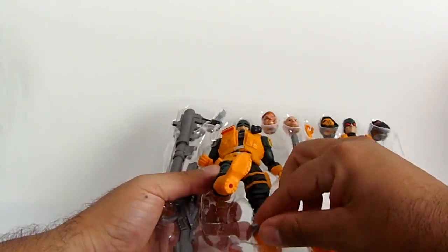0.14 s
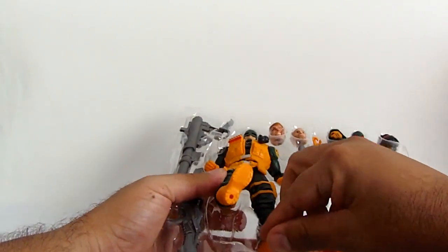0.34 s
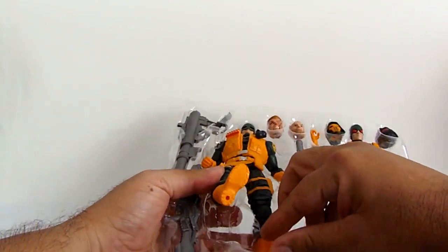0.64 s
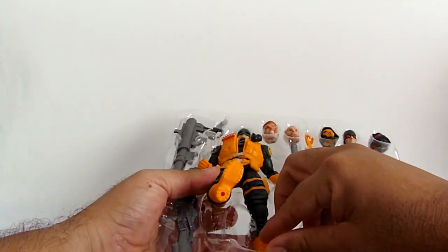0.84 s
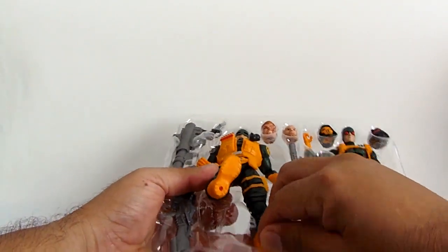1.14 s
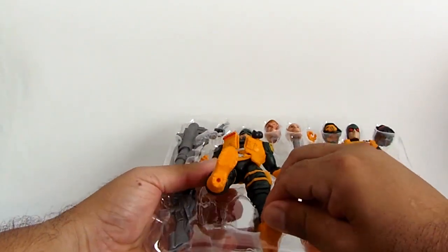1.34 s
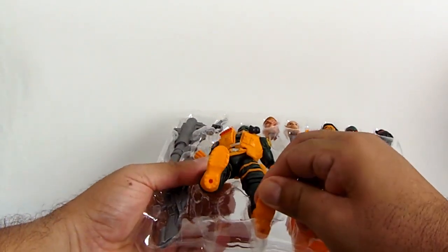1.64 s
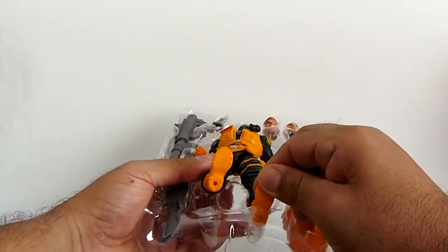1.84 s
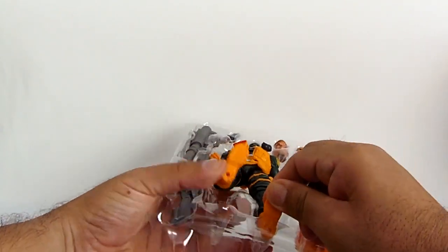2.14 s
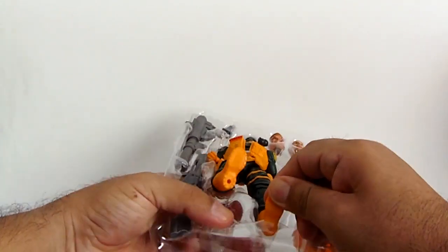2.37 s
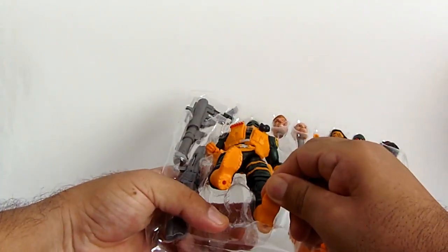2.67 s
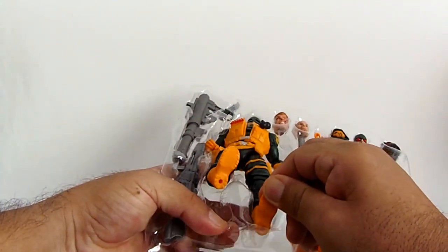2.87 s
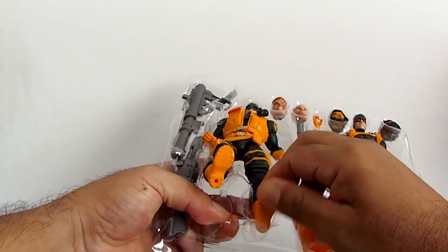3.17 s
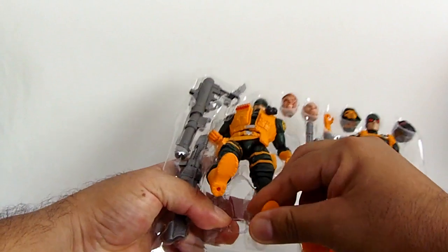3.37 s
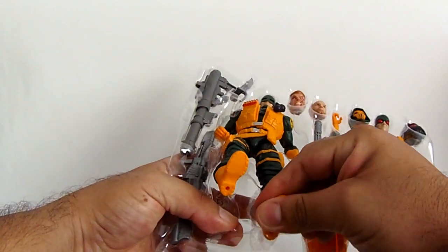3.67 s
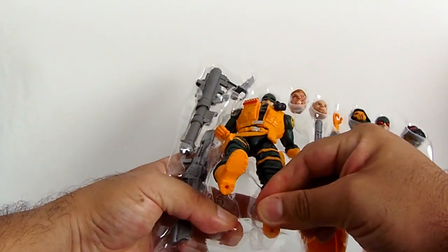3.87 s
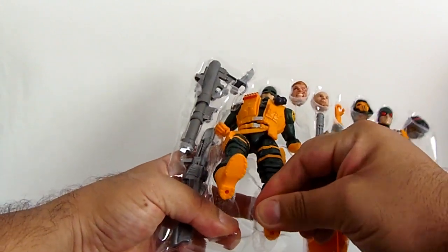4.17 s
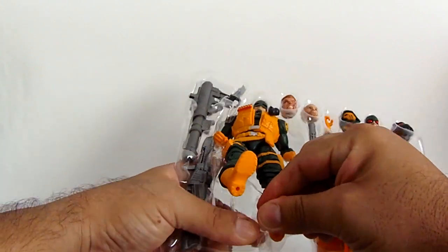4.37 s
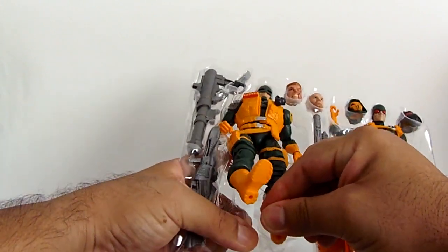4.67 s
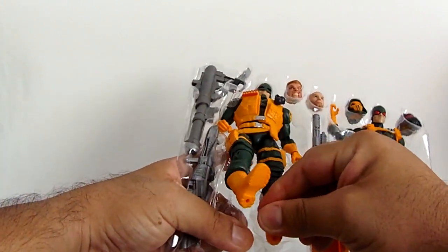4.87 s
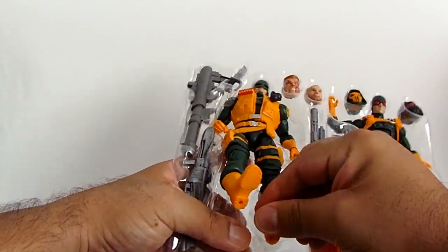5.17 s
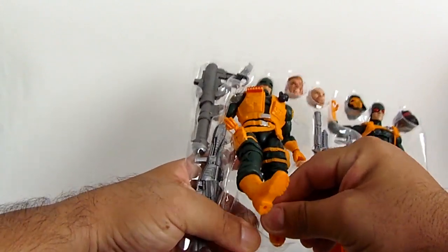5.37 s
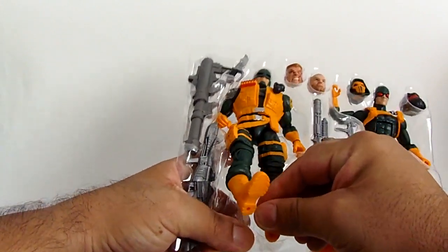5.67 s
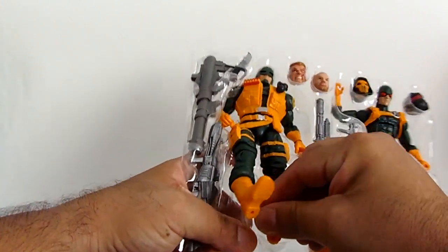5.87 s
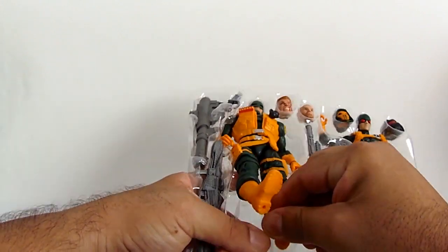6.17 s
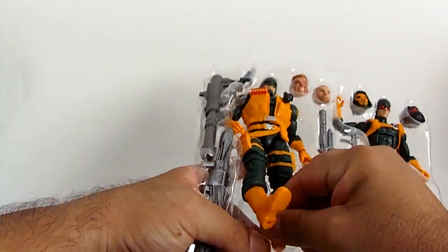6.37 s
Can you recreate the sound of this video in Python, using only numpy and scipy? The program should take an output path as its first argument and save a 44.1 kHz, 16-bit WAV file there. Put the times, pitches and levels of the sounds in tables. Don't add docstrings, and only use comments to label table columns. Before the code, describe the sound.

A thin blister sheet buckles under squeezing fingers: fine fizzing creases, dull pops and bright snaps, irregular and never rhythmic. The hollow tray answers with short low-mid knocks and a faint hum. Loudest cracks arrive in the middle and second half, between thinner ticking gaps. Close microphone, small room, brief reflections, faint air hiss and table rumble.

```python
import sys
import numpy as np
from scipy import signal
from scipy.io import wavfile
from scipy.ndimage import uniform_filter1d

SR = 44100
rng = np.random.default_rng(int(sys.argv[2]) if len(sys.argv) > 2 else 0)


def wav_out(sig):
    wavfile.write(sys.argv[1], SR, np.round(np.clip(np.atleast_2d(sig).T, -1, 1) * 32767).astype(np.int16))


def linear_from_db(decibels):
    return 10 ** (np.asarray(decibels, float) / 20)


N = 287658

# start_s, low_db, pitch_hz, crisp_db, fizz_db
CRACKS = [(.4162, -23.5, 1075, -27.5, -28), (.6062, -26, 3300, -27.5, -39), (.7057, -21, 3130, -15, -17),
          (.7193, -22.5, 1510, -32, -43), (1.1672, -22, 1165, -22.5, -26), (1.199, -24.5, 3570, -19.5, -21),
          (1.7677, -24.5, 1630, -26, -26), (2.012, -24, 2830, -22, -26), (2.0171, -21.5, 2530, -23.5, -23),
          (2.048, -19.5, 4700, -25, -23), (2.0702, -19.5, 1270, -14.5, -22), (2.8276, -17, 3760, -13, -15),
          (2.8352, -16.5, 1014, -32, -19), (3.4183, -20.5, 2770, -18, -30), (4.104, -19, 5870, -13.5, -11),
          (4.12, -16, 1870, -37, -36), (4.4349, -12, 1630, -9.5, -15.5), (4.6371, -26.5, 1790, -23.5, -34),
          (5.0991, -22, 5080, -19, -23.5), (5.3226, -27, 2010, -19, -24), (5.35, -15, 1620, -28, -26),
          (5.993, -30.5, 6050, -16, -36), (6.0942, -21, 1490, -23, -31), (6.254, -15, 3240, -15, -15)]
# start_s, level_db, pitch_hz
POPS = [(0.1908, -28, 1300), (0.282, -34, 1870), (0.3642, -29.5, 1700), (.4397, -26, 1510),
        (1.4836, -32, 1880), (2.377, -31, 1780), (2.4181, -31.5, 2100), (2.5426, -33.5, 1320),
        (2.6731, -26.5, 980), (3.1107, -29.5, 1470), (3.172, -35, 1800), (3.5334, -25.5, 1860),
        (3.538, -29.5, 965), (3.937, -36, 1020), (4.3066, -24.5, 1470), (4.546, -33, 3560),
        (4.9312, -22.5, 1440), (5.206, -23.5, 1440), (5.9018, -23, 1180), (5.915, -29, 1330)]
# start_s, level_db, pitch_hz, fizz_db
CLICKS = [(0.497, -32, 2180, -31), (0.6777, -34, 2740, -32), (0.915, -29, 4100, -31),
          (1.076, -30, 2340, -45), (1.1832, -31, 1850, -29), (1.278, -30.5, 1460, -25.5),
          (1.405, -33.5, 2390, -31), (1.419, -37, 2180, -34), (1.5085, -32.5, 1770, -32),
          (1.6674, -30, 4860, -27.5), (1.8727, -28.5, 1560, -28), (1.927, -31, 2220, -30.5),
          (2.1358, -38, 1740, -30), (2.3022, -27, 1040, -31), (2.512, -25.5, 975, -28),
          (2.782, -28, 1260, -28.5), (3.591, -31, 3070, -48), (3.662, -37, 1370, -52),
          (3.782, -33, 2200, -28), (4.063, -31, 1170, -32), (4.1994, -31, 2180, -24),
          (4.2993, -28, 5250, -28), (4.3582, -28, 2750, -29), (4.387, -27.5, 2390, -28.5),
          (4.4747, -31, 1390, -30), (4.9175, -27.5, 1590, -31.5), (5.412, -25.5, 1700, -27),
          (6.197, -32.5, 1490, -35), (6.474, -33, 1240, -36), (6.49, -33, 1410, -33)]
# start_s, crisp_db, pitch_hz, fizz_db
SNICKS = [(.2181, -31, 4480, -28.5), (0.2545, -27, 6650, -27), (0.653, -28, 4800, -22),
          (0.6996, -19, 5220, -28), (1.448, -32, 3870, -42), (1.565, -39, 2620, -31.5),
          (1.743, -37, 2710, -34), (1.8015, -37, 3900, -30.5), (2.198, -30.5, 1650, -34),
          (2.292, -30, 5230, -31), (2.353, -38, 5600, -29), (2.649, -34, 3440, -31.5),
          (2.881, -27.5, 4830, -30), (3.0746, -34, 4760, -34), (3.343, -32.5, 1570, -40),
          (3.404, -49, 2760, -29), (3.442, -30, 5970, -25), (3.5217, -31, 2900, -28),
          (3.6965, -24, 3760, -33.5), (3.796, -32, 3940, -33), (3.9225, -36, 1400, -32.5),
          (4.42, -23, 4630, -33), (4.728, -34, 5050, -47), (4.973, -28, 4260, -28),
          (5.0444, -25.5, 4760, -45), (5.286, -27, 2400, -33), (5.382, -32, 6200, -28.5),
          (5.894, -29, 1420, -27), (6.06, -30, 1170, -26), (6.072, -35, 4220, -37)]
# start_s, level_db, centre_hz
TICKS = [(0.0682, -32, 3280), (0.168, -32, 3460), (0.1795, -43, 5300), (0.966, -33, 1080),
         (0.9792, -33, 5700), (1.019, -36, 1010), (1.124, -31, 1900), (1.523, -30, 4270),
         (1.6793, -31, 4150), (1.8606, -34, 6350), (1.882, -22.5, 1040), (2.0082, -23, 2600),
         (2.8246, -17, 1750), (2.9532, -38, 6400), (1.396, -38, 4000), (1.43, -30, 3000), (3.26, -41, 4950),
         (3.231, -39, 5170), (3.2788, -38, 2100), (3.285, -29.5, 2920), (3.632, -33.5, 4020),
         (3.7483, -31.5, 2190), (3.9643, -29.5, 4500), (3.985, -31, 1120), (4.61, -32, 9700),
         (5.214, -22, 4570), (5.5613, -32.5, 5900), (5.8087, -32, 3560)]
# start_s, level_db, pitch_hz
OVERTONES = [(1.1978, -44, 4800), (1.7685, -21.5, 2980), (1.769, -24, 3630), (2.0712, -20.0, 2430),
             (2.0705, -18.5, 3460), (2.8294, -21, 1100), (2.834, -13.5, 2842), (4.1183, -26, 4100),
             (4.1186, -20.5, 4700), (4.3064, -27, 1970), (5.1, -22, 4010), (5.101, -24, 1560),
             (5.3222, -17, 4280), (5.324, -20.5, 1440), (5.3234, -14, 2060), (5.3495, -21, 4920),
             (5.993, -22, 4290), (6.004, -24, 1378), (6.2528, -25, 4000), (4.638, -30.5, 1180)]
# start_s, level_db, pitch_hz
CREASES = [(0.0135, -39, 1350), (0.1524, -42, 1220), (0.3356, -40, 1590), (0.3783, -31.5, 1170),
           (0.428, -35, 1600), (0.7936, -41, 1040), (0.8322, -39, 1250), (0.8694, -41.0, 1210),
           (1.0829, -37, 1210), (1.0973, -37, 2820), (1.1758, -34, 1120), (1.2592, -31, 4130),
           (1.5713, -39, 5800), (1.5987, -44, 5240), (1.7555, -45, 3960), (1.85, -39, 6230),
           (1.9366, -36, 2170), (1.9655, -43, 1710), (2.1007, -26.5, 1140), (2.2129, -42.0, 3920),
           (2.2431, -49, 2140), (2.4112, -37, 1100), (2.4425, -37, 4220), (2.5924, -39, 2750),
           (2.8055, -39, 1780), (3.13, -43, 1460), (3.2245, -44, 1680), (3.303, -39, 4040),
           (3.4572, -33.0, 1940), (3.603, -39, 1050), (4.0312, -42, 920), (4.2624, -37.0, 1500),
           (4.3285, -32, 1080), (4.3468, -32, 1150), (4.3665, -30, 1110), (4.4781, -32, 1680),
           (4.5123, -47, 2150), (4.6042, -38, 5060), (5.2349, -29.5, 2450), (5.3001, -39, 4300),
           (5.4925, -44, 5840), (5.5112, -43, 1330), (5.6153, -41, 5240), (5.8734, -45, 1450),
           (5.9182, -41, 2110), (6.0532, -38, 5100), (6.4372, -43, 1770)]
# start_s, level_db, centre_hz
GLINTS = [(0.0685, -43, 10410), (0.1435, -40, 10650), (0.3742, -33, 15040), (0.3896, -32, 12740),
          (0.5029, -36, 13480), (0.5195, -41.0, 8750), (0.641, -26, 12500), (0.8432, -39, 8500),
          (1.0693, -38, 12420), (1.1485, -39, 13700), (1.1529, -38, 8210), (1.3835, -43, 13430),
          (1.5012, -46.5, 14210), (1.7552, -35, 13140), (1.8523, -42, 10400), (1.9366, -46, 12520),
          (1.9669, -43.5, 13470), (2.2128, -44.5, 9180), (2.559, -45.0, 8990), (2.6194, -37, 11900),
          (2.7373, -40.5, 8060), (2.8069, -35, 15620), (2.8898, -31, 15280), (3.1285, -40, 15280),
          (3.3555, -42, 14180), (3.368, -37, 11500), (3.383, -36, 10500), (3.6019, -44, 8200),
          (4.0175, -43, 14280), (4.19, -35, 8550), (4.3104, -30, 12700), (4.3237, -29, 8610),
          (4.6046, -36, 10370), (4.6199, -40.0, 12780), (4.6734, -42, 13500), (5.038, -32, 12300),
          (5.0898, -34.5, 10450), (5.1776, -35, 14700), (5.278, -34, 13600), (5.4366, -41, 12200),
          (5.5305, -39, 8490), (5.6672, -47.5, 13610), (5.7538, -49, 13960), (6.0251, -35, 8340),
          (6.0739, -36, 14510), (6.2375, -40, 8270), (6.5163, -45, 10600)]
# start_s, length_s, body_db, fizz_db
RUB = (4.762, .05, -38, -42)
# top_s, crackle_db, let_go_s, hum_over_crackle_db
SQUEEZES = [(0.0, -43.5, 0.097, 11.5), (.212, -44, 0.3, 3.5), (0.42, -39, 0.24, 3),
            (0.667, -30.5, 0.14, -2), (.916, -44, 0.071, -14), (1.027, -38, 0.03, -2.5),
            (1.213, -36.5, 0.17, -4), (1.421, -47, 0.14, -20), (1.682, -49.5, 0.15, -1),
            (1.931, -44, 0.22, 1.5), (2.081, -29, 0.082, -1.5), (2.299, -42, 0.21, -3),
            (2.42, -35.5, 0.029, -3), (2.53, -45.5, 0.28, -1), (2.85, -39.5, 0.18, -4.5),
            (3.121, -45, 0.039, 8.5), (3.391, -41.5, 0.26, 0.5), (3.793, -56, 0.085, 6),
            (4.04, -50.5, 0.32, 10.5), (4.125, -37.5, 0.21, -0.5), (4.318, -40.5, 0.12, 6.5),
            (4.451, -39.5, 0.21, -2.5), (4.94, -40, 0.12, 1.5), (5.104, -33.5, 0.062, -4.5),
            (5.244, -33.5, 0.12, -2), (5.4, -52, 0.16, -6), (5.921, -35, 0.35, 0.5),
            (6.269, -42.5, 0.08, 5)]
# time_s, crackle_db, fizz_over_crackle_db
HOLD = [(0.0, -58, -4.5), (.9, -49, -4), (1.7, -55, -3.5), (2.2, -55, -5), (2.9, -55.5, -6.5),
        (3.2, -58, -12), (3.38, -56, -7), (3.56, -51, -10.5), (3.9, -52, -9), (4.6, -53.5, -5),
        (5.3, -45, -4), (5.7, -53.5, -3.5), (6.52, -52.5, -5.5)]
# freq_hz, level_db (per Hz)
SHEET = [(700, -8), (1000, 1), (1500, 3.5), (2300, 2), (5000, -0.5), (7400, -4.5)]
# freq_hz, level_db (per Hz)
FIZZ = [(7000, -5.5), (8200, 0.5), (10000, 0), (12700, 2), (15500, -0.5), (16500, -25)]
# pitch_hz, width_hz, level_db
HOLLOW = [(267, 45, -22), (322, 120, -4.5), (378, 98, 2.5), (461.5, 140, 4), (546, 50, -5),
          (1010, 540, -9.5)]
# start_s, peak_db, pitch_hz
KNOCKS = [(0.193, -32, 544), (0.366, -26.5, 369), (0.463, -36, 384), (0.499, -28, 360), (0.64, -35, 480),
          (1.018, -37, 544), (1.874, -37, 346), (2.069, -30.5, 398), (2.092, -27.5, 420),
          (2.54, -29.5, 399), (2.673, -35, 410), (2.826, -22, 397), (3.171, -35, 366), (3.418, -35.5, 553),
          (3.781, -34.5, 463), (4.12, -28.5, 572), (4.221, -31, 442), (4.295, -26, 366),
          (4.446, -23.5, 334), (4.476, -32, 419), (4.917, -31, 376), (5.081, -31.5, 366), (5.319, -35, 418),
          (5.349, -30.5, 400), (6.254, -25, 382), (6.268, -31, 794), (6.395, -34.5, 360), (3.545, -32, 329),
          (2.075, -29.5, 266),
          (0.342, -36, 360), (0.6055, -38, 442), (1.1967, -34.5, 458), (1.557, -45, 456), (1.73, -47, 394),
        (1.768, -43, 368), (1.9179, -36.5, 540), (2.3758, -41, 450), (3.025, -42, 403),
        (3.4864, -35.5, 382), (3.8554, -45, 380), (3.94, -37, 370), (3.9851, -39, 398), (4.175, -39, 360),
        (4.3517, -30, 420), (4.3688, -28, 362), (4.6475, -39, 370), (4.8682, -37.5, 364),
        (4.9448, -32, 360), (5.205, -31, 457), (5.2296, -29.5, 400), (6.0945, -32.5, 315),
        (6.209, -40, 403), (6.4386, -43, 526), (0.049, -39, 392), (0.225, -33, 472), (0.413, -32, 347),
        (0.658, -30.5, 343), (1.159, -40.5, 380), (2.306, -36, 410), (2.422, -38.5, 403), (3.098, -42, 336),
        (4.066, -36, 378), (4.511, -38, 388), (5.898, -31, 550), (5.987, -33, 405), (6.08, -36.5, 353),
        (0.015, -48, 725), (4.264, -40, 780), (5.134, -55, 748)]
# start_s, peak_db, pitch_hz
THUMPS = [
    (0.479, -35, 90),
    (0.699, -31.5, 194),
    (1.388, -41.5, 153),
    (2.419, -38, 135),
    (3.311, -32, 61.5),
    (3.34, -40, 134),
    (4.488, -46, 116),
    (5.907, -30, 93),
    (6.099, -32, 132),
]
# freq_hz, t60_s
ROOM = [(250, 0.36), (1000, 0.28), (4000, 0.21), (12000, 0.16)]
# time_s, shake_db
RUMBLE = [(0.0, -51), (1.7, -60), (2.08, -50), (2.22, -62), (2.48, -43.5), (2.84, -49.5), (3.1, -58),
          (3.35, -43), (3.8, -49), (4.46, -50), (4.7, -57.5), (5.24, -50.5), (5.6, -56.5), (5.93, -48),
          (6.12, -55), (6.52, -58)]
# freq_hz, level_db (per Hz)
AIR = [(20, -16), (185, -32), (400, 5.5), (1400, -1.5), (5000, -5), (15500, -63)]

POP_CRISP_DB, POP_FIZZ_DB = -7, -15
CLICK_CRISP_DB, SNICK_BODY_DB = 0.5, -8
OVERTONE_RISE_S, OVERTONE_FALL_S = 0.00054, 0.0015
CREASE_FALL_S, GLINT_FALL_S = 0.003, 0.0012
AFTER_S, AFTER_DB = 0.018, -15
SWELL_SHARE, LET_GO_DB = 0.5, -18.5
HOLD_HUM_DB = 1
THUMP_RISE_S, THUMP_T60_S = 0.0062, 0.1
THUD_SHAKE_DB, THUD_HUM_DB = -14.5, -12
NOTCH_HZ, NOTCH_Q = 7800, 24
EDGE_HZ, SNAP_EDGE_HZ = 15850, 16700


def evened(x):
    return x / np.sqrt(np.mean(x ** 2) + 1e-20)


def read(points, hz):
    f, value = np.transpose(points)
    return np.interp(np.log(hz + 1), np.log(f + 1), value)


def curve(rows, column):
    rows = np.array(rows)
    return np.interp(np.arange(N) / SR, rows[:, 0], rows[:, column])


def add(mix, s, sound):
    part = mix[round(s * SR):][:len(sound)]
    part += sound[:len(part)]


def band(x, lo_hz, hi_hz, order=2):
    return signal.sosfilt(signal.butter(order, [lo_hz, hi_hz], "band", fs=SR, output="sos"), x)


def colour(x, points):
    hz = abs(np.fft.fftfreq(4096, 1 / SR))
    closed = [(points[0][0] / 2, -50)] + list(points) + [(points[-1][0] * 1.54, -40)]
    log_gain = np.log(linear_from_db(read(closed, hz)))
    phase = -signal.hilbert(log_gain).imag
    taps = np.fft.ifft(np.exp(log_gain + 1j * phase)).real[:2048]
    return signal.oaconvolve(x, taps)[:len(x)]


def ring(x, hz, width):
    r = np.exp(-np.pi * width / SR)
    return 2 * signal.lfilter([1 - r], [1, -r * np.exp(2j * np.pi * hz / SR)], x).real


def snap(low_db, hz, crisp_db, fizz_db, noise):
    t = np.arange(noise.shape[1]) / SR

    def shape(rise, fall):
        return (1 - np.exp(-t / rise)) * np.exp(-np.maximum(t - .0006, 0) / fall)

    def head(x):
        return x / np.sqrt(np.mean(x[:160] ** 2))

    low = head(band(noise[0] * shape(0.00066, 0.0054), 960, 3020))
    crisp = head(band(noise[1] * shape(0.00017, 0.0022), 3590, 6460))
    fizz = head(colour(noise[2] * shape(0.0001, 0.002), FIZZ))
    unsteady = noise[3, 0] + 0.018 * np.cumsum(noise[3])
    facet = head(shape(0.0002, 3.5 / hz) * np.sin(2 * np.pi * hz * t + unsteady))

    height = np.clip(np.log2(hz / 2700) / 0.58, 0, 1)
    facet_db = (1 - height) * low_db + height * crisp_db
    torn = linear_from_db(low_db - 0.99 * (2.5 - height)) * low + linear_from_db(crisp_db - 1.5 * height) * crisp
    return torn + linear_from_db(facet_db - 1.0) * facet + linear_from_db(fizz_db) * fizz


def snaps():
    voices = list(CRACKS)
    voices += [(s, db, hz, db + POP_CRISP_DB, db + POP_FIZZ_DB) for s, db, hz in POPS]
    voices += [(s, db, hz, db + CLICK_CRISP_DB, fizz_db) for s, db, hz, fizz_db in CLICKS]
    voices += [(s, db + SNICK_BODY_DB, hz, db, fizz_db) for s, db, hz, fizz_db in SNICKS]
    for s, db, hz in TICKS:
        low_db = db - 4 - 5 * max(np.log2(hz / 2200), 0)
        crisp_db = db - 4.5 - 5 * abs(np.log2(hz / 4800))
        fizz_db = db - 8.0 - 5 * max(np.log2(6000 / hz), 0)
        voices.append((s, low_db, min(hz, 7000), crisp_db, fizz_db))
    out, noise = np.zeros(N), rng.standard_normal((len(voices), 4, 900))
    for (s, *voice), z in zip(voices, noise):
        add(out, s, snap(*voice, z))
    return linear_from_db(-3.5) * out


def overtones():
    out, t = np.zeros(N), np.arange(900) / SR
    shape = (1 - np.exp(-t / OVERTONE_RISE_S)) * np.exp(-t / OVERTONE_FALL_S)
    for s, db, hz in OVERTONES:
        add(out, s, linear_from_db(db + 9.5) * shape * np.sin(2 * np.pi * hz * t))
    return out


def folds(rows, fall, width, air_db, air):
    out, t = np.zeros(N), np.arange(1500) / SR
    shape = (1 - np.exp(-t / 0.00022)) * (np.exp(-t / fall) + linear_from_db(AFTER_DB) * np.exp(-t / AFTER_S))
    noise = rng.standard_normal((len(rows), 2, len(t))) * shape
    for (s, db, hz), (a, b) in zip(rows, noise):
        fold = evened(ring(a, hz, width * hz)) + linear_from_db(air_db) * evened(band(b, *air))
        add(out, s, linear_from_db(db - 0.5) * fold / np.sqrt(np.mean(fold[:130] ** 2)))
    return band(out, 335, EDGE_HZ, order=14)


def grip():
    s, db, let_go, hum_db = np.transpose(SQUEEZES)[:, :, None]
    coarse = np.arange(0, N, 64)
    late = (coarse / SR - s) / let_go
    work = linear_from_db(db + LET_GO_DB * np.maximum(late, -late / SWELL_SHARE))

    def power(gain):
        return np.interp(np.arange(N), coarse, (gain ** 2).sum(0))

    hold = linear_from_db(curve(HOLD, 1))
    sheet = np.sqrt(hold ** 2 + power(work))
    fizz = sheet * linear_from_db(curve(HOLD, 2))
    hum = np.sqrt((linear_from_db(HOLD_HUM_DB) * hold) ** 2 + power(work * linear_from_db(hum_db)))
    return sheet, fizz, hum


def grains(per_s, spread_db, fall):
    size = linear_from_db(spread_db * np.minimum(rng.exponential(1, N), 4))
    size = size * (rng.random(N) < per_s / SR)
    return signal.lfilter([1], [1, -np.exp(-1 / (fall * SR))], size)


def pips():
    t, out = np.arange(300) / SR, np.zeros(N)
    for hz in np.geomspace(1100, 6500, num=10):
        size = linear_from_db(7.9 * np.minimum(rng.exponential(1, N), 2.6)) * (rng.random(N) < 22 / SR)
        pip = np.sin(2 * np.pi * hz * t) * t * np.exp(-t * hz / 1.24) * hz
        out += signal.oaconvolve(size, pip)[:N]
    return evened(out)


def crackle():
    slips = evened(grains(900, spread_db=4.5, fall=0.0068))
    slips = evened(slips / np.sqrt(uniform_filter1d(slips ** 2, size=2000)))
    ticks = evened(grains(300, spread_db=3.5, fall=0.00049))
    sheet = evened(colour((slips + 0.34 * ticks) * rng.standard_normal(N), SHEET)) + .46 * pips()
    fizz = evened(colour((slips + 0.66 * ticks) * rng.standard_normal(N), FIZZ))

    push = (slips + evened(grains(150, spread_db=1.5, fall=0.0064))) * rng.standard_normal(N)
    hum = np.zeros(N)
    for hz, width, db in HOLLOW:
        width = 1.14 * width
        hum += linear_from_db(db) * ring(ring(push, hz, width), hz, width)
    sheet_gain, fizz_gain, hum_gain = grip()
    return sheet_gain * sheet + fizz_gain * fizz + hum_gain * evened(hum)


def rub():
    s, length, body_db, fizz_db = RUB
    out, (a, b) = np.zeros(N), rng.standard_normal((2, N))
    hiss = linear_from_db(body_db) * evened(colour(a, SHEET)) + linear_from_db(fizz_db) * evened(colour(b, FIZZ))
    n = round(length * SR)
    add(out, s, signal.windows.tukey(n, .25) * hiss[SR:SR + n])
    return out


def knocks():
    out, t = np.zeros(N), np.arange(2600) / SR
    fade = linear_from_db(-60 * t / 0.028) + linear_from_db(-16.5 - 60 * t / 0.1)
    shape = fade * (1 - np.exp(-t / 0.0021))
    for s, db, hz in KNOCKS:
        swing = np.zeros(len(t))
        for share, ratio in ((1, 1), (0.4, 1.328), (0.15, 1.75)):
            swing += share * np.sin(2 * np.pi * ratio * hz * t)
        add(out, s, linear_from_db(db + 11.5) * shape * swing)
    return out


def thumps():
    out, t = np.zeros(N), np.arange(6000) / SR
    shape = linear_from_db(-60 * t / THUMP_T60_S) * (1 - np.exp(-t / THUMP_RISE_S))
    for s, db, hz in THUMPS:
        add(out, s, linear_from_db(db + 2.0) * shape * np.sin(2 * np.pi * hz * t))
    return out


def tail():
    taps = np.zeros(SR // 2)
    at = np.arange(200, len(taps) - 20, 20)
    clumps = linear_from_db(5.5 * evened(uniform_filter1d(rng.standard_normal(len(at)), 6)))
    taps[at + rng.integers(0, 20, len(at))] = clumps * rng.choice([-1., 1.], len(at))
    hz, t, z = signal.stft(taps, SR, nperseg=128)
    out = signal.istft(z * linear_from_db(-60 * t / read(ROOM, hz)[:, None]), SR, nperseg=128)[1]
    return out / np.linalg.norm(out)


def room(x):
    wall = np.zeros(N)
    smear = rng.standard_normal(12) / np.sqrt(12)
    add(wall, .0083, linear_from_db(-18.0) * np.convolve(x, smear)[:N])
    turn = 2 * np.pi * (3.1 * np.arange(N) / SR + np.arange(3)[:, None] / 3)
    shares = np.sqrt(2 / 3) * np.cos(turn)
    return wall + linear_from_db(-11) * sum(signal.fftconvolve(x * share, tail())[:N] for share in shares)


def rumble():
    shake = colour(rng.standard_normal(N), [(16, 7), (40, 5), (80, -3.5)])
    lumps = grains(140, spread_db=6.0, fall=0.023) * rng.standard_normal(N)
    thuds = colour(lumps, [(80, 1.0), (130, 4.5), (230, -4.0)])
    table = linear_from_db(curve(RUMBLE, 1))
    hum = uniform_filter1d(grip()[2], size=4000)
    jolt = np.hypot(linear_from_db(THUD_SHAKE_DB) * table, linear_from_db(THUD_HUM_DB) * hum)
    return table * evened(shake) + jolt * evened(thuds)


def quiet_air():
    return linear_from_db(-55.0) * evened(colour(rng.standard_normal(N), AIR))


def scene():
    hits, hollow = snaps() + overtones(), knocks()
    creases = folds(CREASES, CREASE_FALL_S, width=0.19, air_db=-4.0, air=(900, 7000))
    glints = folds(GLINTS, GLINT_FALL_S, width=0.17, air_db=-1.5, air=(7500, 16000))
    sheet = hits + creases + glints + linear_from_db(1.5) * crackle() + rub()
    tray = hollow + thumps()
    mix = sheet + tray + room(hits + 0.82 * hollow) + rumble() + quiet_air()
    return mix[None]


def roll_off(x):
    return signal.sosfilt(signal.butter(12, 16980, fs=SR, output="sos"), x)


def record(dry):
    x = signal.lfilter(*signal.iirnotch(NOTCH_HZ, NOTCH_Q, SR), dry)
    x = np.tanh(0.79 * x + 0.098 * dry)

    def limited(edge_hz):
        taps = signal.firwin(1023, edge_hz, window=("kaiser", 9), fs=SR)
        return signal.oaconvolve(x, taps[None], "same")

    low, wide = limited(EDGE_HZ), limited(SNAP_EDGE_HZ)
    power = uniform_filter1d(np.diff(low, n=2, prepend=[[0, 0]]) ** 2, size=128)
    before = uniform_filter1d(power, 1000, origin=499)
    sharp = uniform_filter1d(1. * (power > 30 * before), 128) > 0
    opening = uniform_filter1d(1. * sharp, 128)
    return roll_off(low + (wide - low) * opening)


dry = scene()
out = record(dry)
wav_out(out)
```